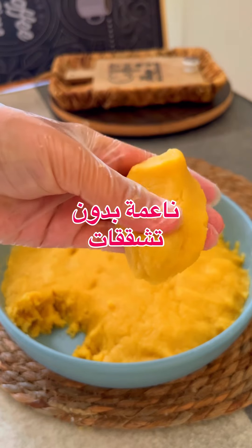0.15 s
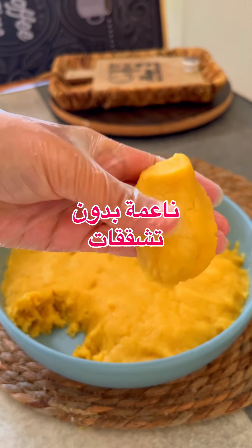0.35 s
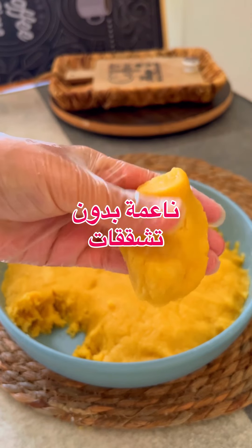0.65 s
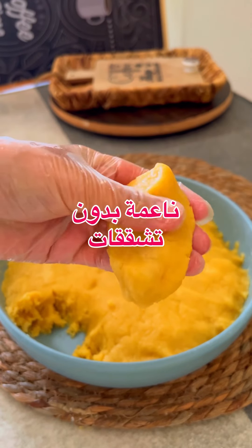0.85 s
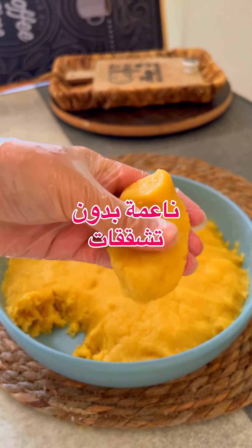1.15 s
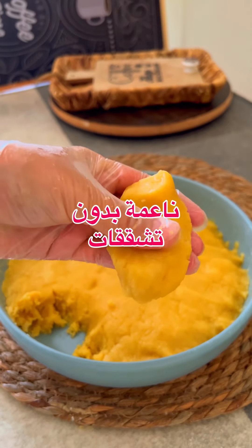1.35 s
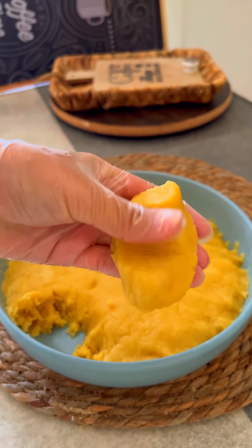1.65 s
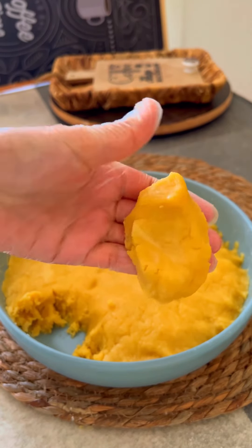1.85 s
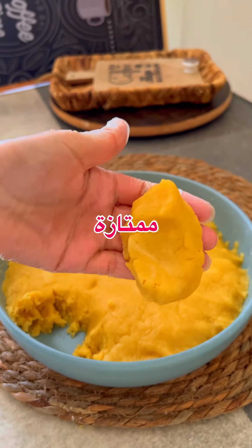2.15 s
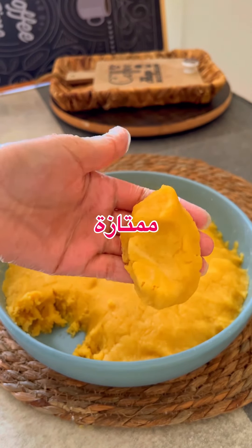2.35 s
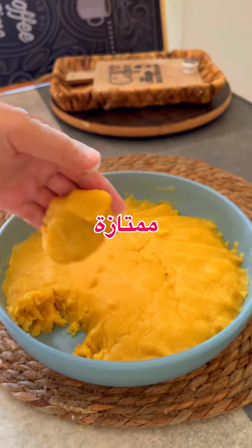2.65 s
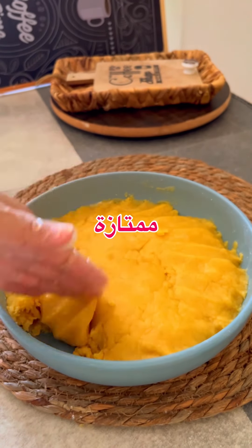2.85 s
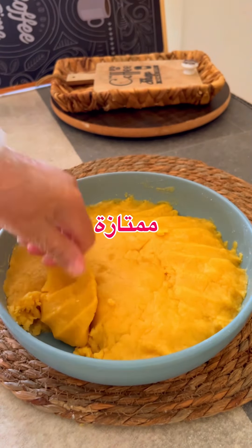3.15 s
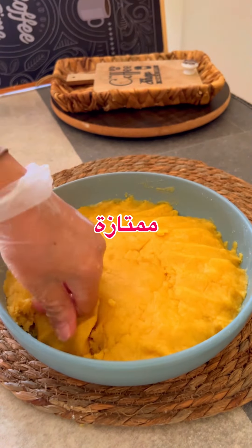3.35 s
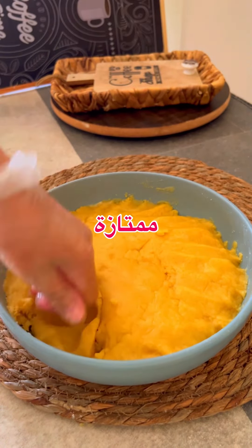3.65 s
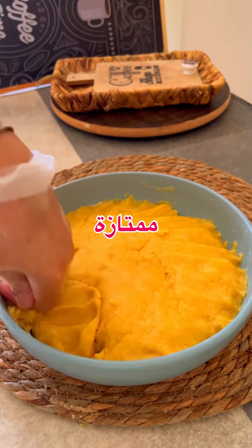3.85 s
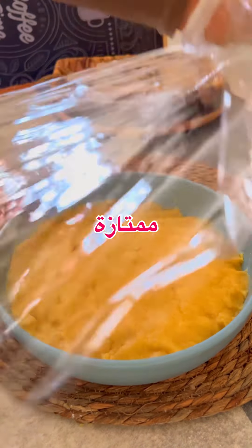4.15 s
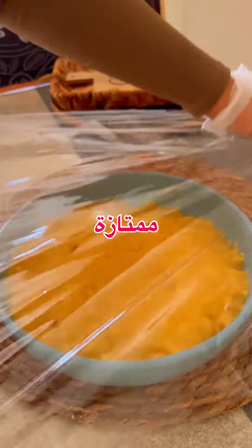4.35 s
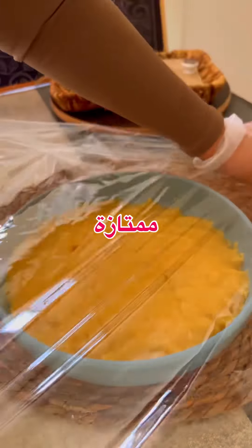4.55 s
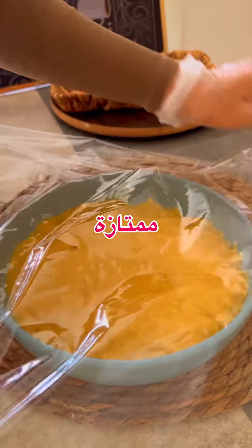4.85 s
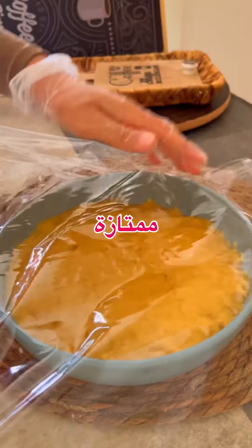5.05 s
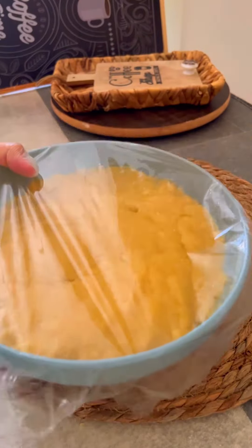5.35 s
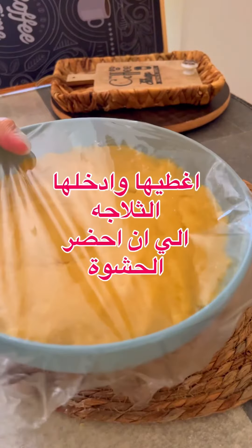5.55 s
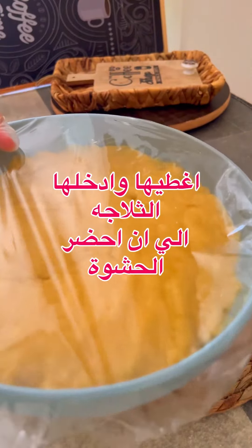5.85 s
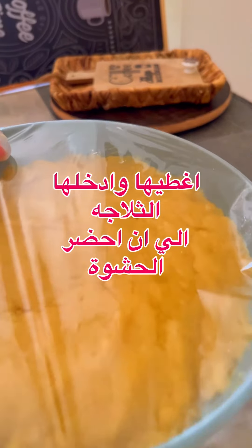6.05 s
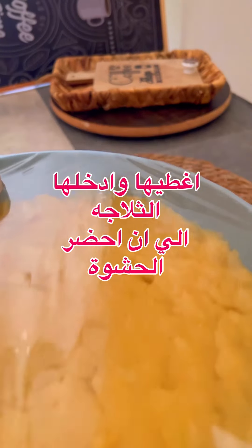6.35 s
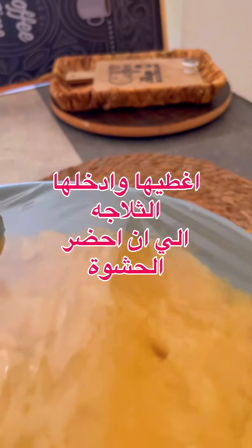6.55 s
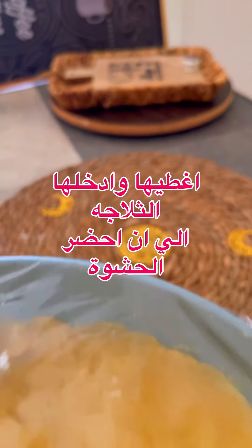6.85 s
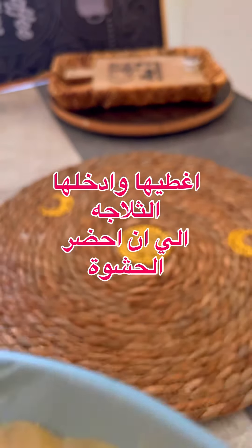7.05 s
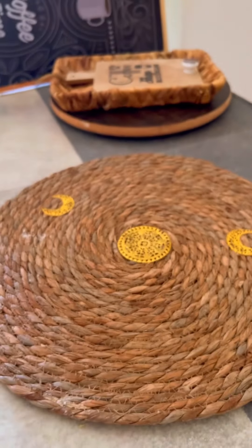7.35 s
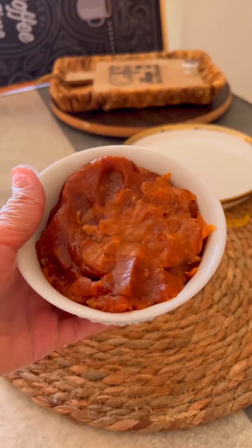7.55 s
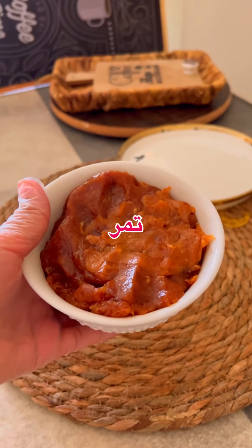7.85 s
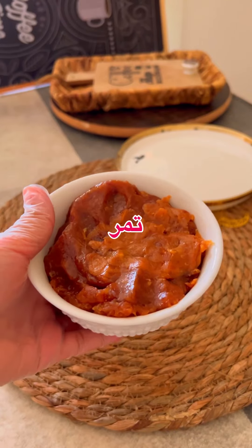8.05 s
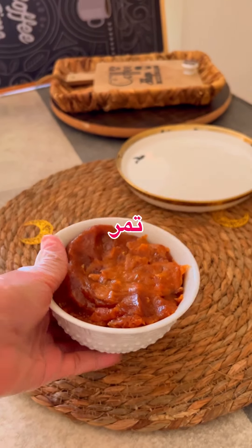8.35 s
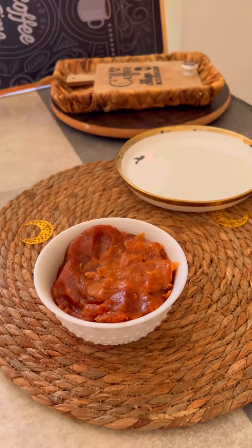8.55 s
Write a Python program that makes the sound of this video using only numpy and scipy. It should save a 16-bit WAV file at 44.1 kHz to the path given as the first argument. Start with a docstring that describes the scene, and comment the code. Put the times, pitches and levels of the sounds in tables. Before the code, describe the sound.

A fridge hums low in a small kitchen. Close to the microphone, a hand in a thin plastic glove smooths and presses soft dough with faint swishes, tiny snaps and sticky smacks. Cling film is then stretched over a bowl, crackling, popping and squeaking, louder than the rest. The bowl scrapes faintly, dishes tick, and a small dish rasps onto a woven mat and clinks.

```python
"""A fridge hums in a small kitchen throughout. Close up, a hand in a thin plastic glove smooths soft dough
with sticky smacks, then presses it into its bowl. From 4 s cling film is drawn over the bowl and swept
tight: it crackles, pops and squeaks. Near 6.5 s the bowl scrapes and is lifted off; near 8.5 s a small
dish rasps onto a woven mat and clinks. Four times the sound dips briefly and the hum steps in level."""
import sys
import numpy as np
from scipy import signal
from scipy.fft import rfft, irfft, next_fast_len
from scipy.io import wavfile

SR = 44100
rng = np.random.default_rng(int(sys.argv[2]) if len(sys.argv) > 2 else 0)


def log_audio(samples):
    """Write samples as a 16-bit WAV file to the path given in sys.argv[1]."""
    # one column per channel
    frames = np.atleast_2d(samples).T
    # limit to full scale, then quantise
    limited = np.clip(frames, -1, 1)
    pcm = np.round(limited * 32767).astype(np.int16)
    wavfile.write(sys.argv[1], SR, pcm)


N = 383662
TIME_S = np.arange(N) / SR

# background steps: (start [s], beat crest [s], hum [dB], buzz [dB], casing [dB], rumble [dB], draught [dB])
PASSAGES = [(0, 0.416, -51, -69, 2.5, -54.5, -73), (3.955, 4.05, -49, -60, 0.5, -55.5, -76),
            (5.336, 5.452, -49.5, -59.5, 0.3, -55.5, -83), (7.4945, 7.694, -55.5, -64, -10.5, -61, -83),
            (8.435, 8.58, -55, -70, -14, -59.5, -78)]
# hum waver in the first passage: (time [s], gain [dB])
HUM_WAVER = [(0, 0), (.42, 4.5), (.8, 1), (1.45, 6), (2.0, -7.5), (2.4, 7), (2.7, 5), (3.3, -6.5),
             (3.7, -1.5)]
# motor's fourth order: (time [s], level [dB])
MOTOR_OVERTONE = [(0, -63.5), (.9, -67.5), (1.2, -56.5), (2.0, -60), (3.3, -70.5), (3.85, -67), (4.1, -57),
                  (5.1, -67), (6.2, -67.5), (6.8, -59), (7.8, -64)]
# fridge casing modes, and a faint room resonance near 900 Hz: (frequency [Hz], width [Hz], level [dB])
CASING_MODES = [(193.6, 4.4, -62), (312.6, 2.7, -70), (345.8, 2.9, -70.5), (374.5, 2.5, -74.5),
                (899, 28, -87)]
# room air spectra: (frequency [Hz], level [dB])
RUMBLE_SPECTRUM = [(22, -31), (44, 6.5), (62, -2.5), (82, -8.5), (105, 7.5), (135, -5), (175, 3.5),
                   (260, -2.5), (360, -6.5), (470, -17), (660, -30.5), (1100, -31), (1700, -39.5),
                   (4000, -62.5)]
DRAUGHT_SPECTRUM = [(300, -5.5), (720, 8.5), (900, 10.5), (1020, 5.5), (1300, 2), (2200, -35)]
HISS_SPECTRUM = [(400, 14.5), (750, 5), (1100, 14), (1600, 7.5), (3500, 3), (5000, -2.5), (7500, 3),
                 (10000, -2.5), (12500, -16.5), (16000, -36)]
# stereo width of air and of close sounds: (frequency [Hz], side over mid [dB])
AIR_WIDTH = [(130, -16), (260, -15), (520, 2), (1000, 0.5), (4000, -2.5), (12000, -7.5)]
CLOSE_WIDTH = [(400, -16), (3000, -34), (7000, -5), (10000, -7), (13000, -1.5)]
# friction spectra: (frequency [Hz], level [dB])
GLOVE_SPECTRUM = [(350, -32.5), (600, -5.5), (1030, -21), (1260, -9), (2200, -7.5), (3680, -10.5),
                  (4840, -7.5), (6120, 4), (9240, 7.5), (10300, 6), (12000, -14), (14900, -6.5)]
FILM_SPECTRUM = [(200, -26), (350, 4), (1200, 2.5), (1700, -1.5), (2500, -12), (5000, -22), (6100, -15),
                 (7500, -19), (10200, -15), (11900, -30), (16000, -30)]
MAT_SPECTRUM = [(350, -11.5), (1180, -9.5), (2440, -7), (4460, -13), (5500, -8), (8270, 0.5), (9360, 3),
                (11500, -13.5), (16000, -17)]
# top-octave notch of the microphone port: (frequency [Hz], gain [dB])
PORT_NOTCH = [(10200, -3), (12000, -14), (15000, -5.5)]
# glove creases snap: (time [s], level [dB], centre [Hz])
GLOVE_SNAPS = [(0.2037, -53.5, 7000), (0.2813, -42.5, 5730), (0.621, -46, 9500), (0.6492, -35, 9100),
               (1.0156, -42, 9000), (1.046, -34.5, 8800), (1.1366, -45, 6500), (1.337, -52.5, 6500),
               (1.7945, -47, 6440), (1.816, -48.5, 5700), (2.0223, -51, 4400), (2.8524, -41, 7940),
               (3.0468, -48, 5000), (3.6084, -34, 5760), (3.6214, -36, 10100), (3.642, -33, 5700),
               (3.6665, -42, 5400)]
# thumb smooths the lump: (time [s], swish [dB], rub [dB])
THUMB_STROKES = [(0.287, -63.5, -71), (0.65, -55.5, -72), (1.041, -57.5, -75.5), (1.399, -65, -79.5),
                 (1.655, -58.5, -74.5)]
# dough lets go of the thumb: (time [s], level [dB], centre [Hz])
DOUGH_SMACKS = [(0.7463, -42.5, 2880), (1.0638, -48, 2950), (1.483, -50.5, 2550), (1.7598, -46.5, 2650),
                (1.7742, -44, 2700)]
# fingers slide on dough, film or dish: (time [s], half length [s], level [dB], centre [Hz])
FINGER_SLIDES = [(1.818, 0.015, -61.5, 5600), (1.96, 0.025, -73, 5470), (3.032, 0.014, -64.5, 11500),
                 (3.738, 0.018, -50.5, 6500), (3.772, 0.027, -51.5, 7450), (4.329, 0.0062, -49, 7940),
                 (7.72, 0.1, -86.5, 4760), (8.236, 0.0046, -50.5, 9700), (8.526, 0.0081, -49, 11600)]
# whole hand presses the dough: (time [s], half length [s], level [dB])
HAND_PRESSES = [(1.83, 0.089, -70), (2.58, 0.026, -72.5), (2.778, 0.022, -60.5), (2.845, 0.02, -64),
                (2.93, 0.084, -70), (3.02, 0.024, -66.5), (3.168, 0.014, -58.5), (3.31, 0.15, -74.5),
                (3.609, 0.011, -59.5), (3.644, 0.0084, -57.5), (3.667, 0.0063, -57), (3.805, 0.032, -61),
                (3.89, 0.2, -74)]
# pats of dough and palm, and at 5.12 s a squeak of the film on the rim: (time [s], level [dB], centre [Hz])
SOFT_PATS = [(2.841, -40.5, 470), (2.849, -37.5, 600), (5.123, -25, 1240)]
# film picked up, drawn out, swept round the rim: (start [s], length [s], level [dB], sag [dB/s])
FILM_PULLS = [(3.928, 0.17, -67.5, 38), (4.317, 0.48, -59.5, 8.5), (5.073, 0.23, -49, 33.5)]
# taut film modes: (frequency [Hz], width [Hz], level over the pull [dB])
FILM_MODES = [(574, 730, -5), (1230, 180, -1), (1420, 170, -19)]
# film creases pop: (time [s], level [dB])
FILM_POPS = [(3.9776, -22.5), (4.0864, -36), (4.15, -40.5), (4.185, -36), (4.24, -35.5), (4.3692, -21.5),
             (4.3772, -27), (4.4057, -28), (4.4124, -30), (4.512, -32), (4.566, -22.5), (4.7115, -25.5),
             (4.7586, -31), (4.7754, -23), (4.7812, -28), (4.9035, -43), (4.9627, -41.5), (5.034, -44),
             (6.152, -60)]
# film slips on the rim: (time [s], level [dB], centre [Hz])
FILM_CLUCKS = [(4.547, -38.5, 1280), (4.691, -43, 1170), (4.7361, -42, 1210), (5.087, -37, 1198),
               (5.199, -34, 620)]
# handled dishes tick: (time [s], level [dB], centre [Hz])
DISH_TICKS = [(5.9058, -47, 6940), (6.5145, -45.5, 3530), (6.5745, -42, 7500), (6.691, -47, 4570),
              (6.8516, -52, 6140), (7.3726, -35, 6750), (7.581, -51, 3400), (7.987, -60, 3600),
              (8.214, -43, 8100)]
# bowl and dish slide on the mat: (stop [s], level [dB])
MAT_SLIDES = [(6.6, -72.5), (7.375, -77), (8.24, -77), (8.434, -61.5), (8.581, -56.5), (8.69, -70)]
# small dish modes: (frequency [Hz], width [Hz], level [dB])
DISH_MODES = [(6100, 690, -52.5), (9350, 410, -56)]
# dish thuds and clinks to rest: (time [s], level [dB], centre [Hz])
DISH_KNOCKS = [(8.551, -50, 950), (8.589, -47.5, 900), (8.5895, -28, 8650)]

CUTOFF_HZ = 16000


def from_db(db):
    return 10 ** (np.asarray(db) / 20)


def unit_rms(x):
    return x / np.sqrt(np.mean(x ** 2) + 1e-20)


def gain_curve(rows):
    """Gain through (time [s], level [dB]) points."""
    return from_db(np.interp(TIME_S, *np.transpose(rows)))


def bell(at_s, half_s):
    """Smooth swell of height 1."""
    distance = np.minimum(np.abs((TIME_S[::16] - at_s) / half_s), 8)
    return np.interp(TIME_S, TIME_S[::16], np.exp(-distance ** 1.6))


def strokes(rows):
    """Joint gain of bell-shaped strokes, summed in power."""
    return np.sqrt(sum(from_db(db) ** 2 * bell(at_s, half_s) for at_s, half_s, db in rows))


def passage_columns():
    """Columns of the current passage, per sample."""
    rows = np.array(PASSAGES)
    return rows[np.searchsorted(rows[:, 0], TIME_S, side="right") - 1].T


def colour(x, spectrum):
    """Minimum-phase filter with the given spectrum."""
    size = 2 * next_fast_len(N // 2 + 4096)
    hz, db = np.transpose(spectrum)
    bins_hz = np.arange(size // 2 + 1) * SR / size
    log_gain = np.log(from_db(np.interp(np.log(bins_hz + 1), np.log(hz), db)))
    cepstrum = irfft(log_gain)[:size // 2]
    cepstrum[1:] *= 2
    return irfft(rfft(x, size) * np.exp(rfft(cepstrum, size)))[..., :N]


def band(x, low_hz, high_hz, order=2):
    sos = signal.butter(order, [low_hz, min(high_hz, SR * .48)], "band", fs=SR, output="sos")
    return signal.sosfilt(sos, x)


def resonate(x, hz, width_hz):
    """One resonance, unit peak gain."""
    r = np.exp(-np.pi * width_hz / SR)
    poles = [1, -2 * r * np.cos(2 * np.pi * hz / SR), r * r]
    return signal.lfilter(np.array([1, 0, -1]) * (1 - r * r) / 2, poles, x)


def bent_resonance(x, hz, width_hz, bend):
    """Resonance detuned by the fraction bend; rms 1."""
    carrier = np.exp(2j * np.pi * np.cumsum(hz * (1 + bend)) / SR)
    ringing = signal.lfilter([1], [1, -np.exp(-np.pi * width_hz / SR)], x / carrier + 1e-18)
    return unit_rms(band((ringing * carrier).real, hz / 2, hz * 2))


def drift(rate_hz):
    """Slow random wander; rms 1."""
    hop = 40
    r = np.exp(-2 * np.pi * rate_hz * hop / SR)
    slow = signal.lfilter([1], [1, -2 * r, r * r], rng.standard_normal(N // hop + 2002))[2000:]
    return np.interp(np.arange(N) / hop, np.arange(len(slow)), unit_rms(slow))


def fridge(rumble_gain, shaft_hz=57.87, mains_hz=60):
    """The motor slips behind the mains: its second order beats with the buzz near 4 Hz."""
    _, crest_s, hum_db, buzz_db, casing_db, *_ = passage_columns()
    waver = np.where(TIME_S < PASSAGES[1][0], gain_curve(HUM_WAVER), 1)
    rad_per_hz = 2 * np.pi * (TIME_S - crest_s)
    hum = from_db(hum_db) * waver * np.cos(2 * shaft_hz * rad_per_hz)
    buzz = from_db(buzz_db) * np.cos(2 * mains_hz * rad_per_hz)
    shaft_gain = from_db(-58 - 0.5 * drift(4.3)) * unit_rms(np.sqrt(rumble_gain))
    shaft = shaft_gain * np.cos(shaft_hz * rad_per_hz + rng.uniform(0, 2 * np.pi))
    overtone = gain_curve(MOTOR_OVERTONE) * np.cos(4 * shaft_hz * rad_per_hz)
    casing = 0
    for hz, width_hz, db in CASING_MODES:
        drone = resonate(rng.standard_normal(N), hz, width_hz)
        casing += from_db(db) * unit_rms(resonate(drone, hz, width_hz))
    return np.sqrt(2) * (hum + buzz + shaft + overtone) + from_db(casing_db) * casing


def air_gains(swell_s=2.17, half_s=0.71, draught_lag_s=0.19):
    """Rumble and draught step with each passage and swell once."""
    *_, rumble_db, draught_db = passage_columns()
    return (from_db(rumble_db + 4 * bell(swell_s, half_s)),
            from_db(draught_db + 5 * bell(swell_s + draught_lag_s, half_s)))


def room_air(spectrum):
    """Diffuse stereo noise, nearly mono in the bass."""
    mid, side = (unit_rms(colour(rng.standard_normal(N), spectrum)) for _ in range(2))
    return mid + colour(side, AIR_WIDTH) * [[1], [-1]]


def snaps(events, decay_s, width_ratio, flutter_db, flutter_s):
    """Each release or knock is a brief pitched noise burst with a fluttering tail."""
    out, t = np.zeros(N + SR), TIME_S[:SR // 10]
    envelope = t / decay_s * np.exp(1 - t / decay_s) + from_db(flutter_db) * np.exp(-t / flutter_s)
    for at_s, db, hz in events:
        noise = rng.standard_normal(len(t)) * envelope
        burst = band(resonate(noise, hz, width_ratio * hz), hz / 5, CUTOFF_HZ)
        start = round(at_s * SR)
        out[start:start + len(t)] += from_db(db) * burst / np.max(np.abs(burst))
    return colour(out[:N], PORT_NOTCH)


def slips(per_s, spread_db):
    """Tiny random slips of uneven size and either sign; rms 1."""
    sizes = from_db(spread_db * np.minimum(rng.exponential(1, N), 4)) * rng.choice([-1, 1], N)
    return unit_rms(sizes * (rng.random(N) < per_s / SR))


def crinkle(per_s, low_hz, high_hz, q, count=16):
    """Sparse ticks ringing briefly at scattered pitches; rms 1."""
    pitches_hz = np.geomspace(low_hz, high_hz, count)
    return unit_rms(sum(unit_rms(resonate(slips(per_s / count, 2.7), hz, hz / q)) for hz in pitches_hz))


def friction(crisp_gain, dull_gain, spectrum, norm_low_hz, split_hz, per_s, spread_db, clump_db, smooth_db):
    """Slips clump over a smooth rub: crisp above the split, dull below."""
    grain = slips(per_s, spread_db) + from_db(smooth_db) * rng.standard_normal(N)
    rub = colour(grain * from_db(clump_db * drift(46)), spectrum)
    crisp = unit_rms(band(rub, split_hz, SR / 2, order=3))
    dull = band(rub, 290, split_hz, order=3)
    dull /= np.std(band(dull, norm_low_hz, CUTOFF_HZ, order=4))
    return crisp * crisp_gain + dull * dull_gain


def hand_pressure(half_s=0.03, push_lag_s=0.0083, return_lag_s=0.11):
    """The thumb strokes there and back, then the whole hand presses."""
    pushes = [(at_s + push_lag_s, half_s, db) for at_s, _, db in THUMB_STROKES]
    returns = [(at_s + return_lag_s, half_s, db - 1.5) for at_s, _, db in THUMB_STROKES]
    return strokes(pushes + returns + list(HAND_PRESSES))


def thumb_crinkle(half_s=0.049, level_db=-82):
    """Bright glove ticks gather round each thumb push."""
    pushes = strokes([(at_s, half_s, level_db) for at_s, *_ in THUMB_STROKES])
    ticks = crinkle(per_s=260, low_hz=4500, high_hz=13000, q=2.5)
    return pushes * unit_rms(colour(ticks, PORT_NOTCH))


def glove_on_dough(hand_open_s=2.6, muffle_hz=6140):
    """Thin plastic rubs the dough, sticks and lets go; the lump lands with a pat."""
    pressure = hand_pressure()
    closed = TIME_S < hand_open_s   # the closed hand is muffled and stickier
    rub = friction(pressure * from_db(2.5), pressure, GLOVE_SPECTRUM, norm_low_hz=1770, split_hz=4350,
                   per_s=1400, spread_db=1.5, clump_db=3, smooth_db=-4.5)
    rub = np.where(closed, band(rub, 280, muffle_hz), rub)
    ticks = colour(crinkle(per_s=150, low_hz=2400, high_hz=9000, q=8), PORT_NOTCH)
    sticky = from_db(np.where(closed, -1, -4)) * pressure * ticks
    creases = snaps(GLOVE_SNAPS, decay_s=0.00026, width_ratio=0.56, flutter_db=-5.5, flutter_s=0.005)
    smacks = snaps(DOUGH_SMACKS, decay_s=0.0009, width_ratio=0.3, flutter_db=-20, flutter_s=0.0054)
    pats = snaps(SOFT_PATS, decay_s=0.0029, width_ratio=0.42, flutter_db=-18, flutter_s=0.015)
    return from_db(2.64) * rub + sticky + thumb_crinkle() + creases + smacks + pats


def finger_swishes(thumb_half_s=0.0063, thumb_hz=10400, edge_ratio=1.255):
    """A fast slide is a gritty run of slips hissing round one pitch."""
    grain = colour(slips(per_s=5000, spread_db=2.5), PORT_NOTCH)
    thumb = [(at_s, thumb_half_s, db, thumb_hz) for at_s, db, _ in THUMB_STROKES]
    return sum(strokes([(at_s, half_s, db)]) * unit_rms(band(grain, hz / edge_ratio, hz * edge_ratio))
               for at_s, half_s, db, hz in thumb + list(FINGER_SLIDES))


def film_pull(attack_s=0.076, release_s=0.021, slack_db=-81.5):
    """Each pull takes hold, sags and lets go; the slack sheet rustles between."""
    pull = from_db(slack_db)
    for start_s, length_s, db, sag_db_per_s in FILM_PULLS:
        age_s = np.maximum(TIME_S - start_s, 0)
        attack = np.sqrt(np.minimum(age_s / attack_s, 1))
        release = np.exp(-np.maximum(age_s - length_s, 0) / release_s)
        pull = np.hypot(pull, from_db(db - sag_db_per_s * age_s) * attack * release)
    return pull * (TIME_S >= PASSAGES[1][0]) * (TIME_S < PASSAGES[2][0])


def film_squeak(flutter_db=5.5, flutter_hz=25):
    """Stick-slip rings the taut film's modes, which bend together with tension."""
    bend = 0.086 * drift(15)
    squeak = 0
    for hz, width_hz, db in FILM_MODES:
        drive = slips(per_s=1200, spread_db=4.5) * from_db(flutter_db * drift(flutter_hz))
        squeak += from_db(db) * bent_resonance(drive, hz, width_hz, bend)
    return squeak


def cling_film(pop_hz=6330):
    """Film crackles as it stretches, pops where creases part and clucks on the rim."""
    pull = film_pull()
    crisp_gain = from_db(-9) * pull ** 0.75   # harder pulls sound fuller
    rub = friction(crisp_gain, pull, FILM_SPECTRUM, norm_low_hz=605, split_hz=3300,
                   per_s=1800, spread_db=0, clump_db=2, smooth_db=-9.5)
    folds = from_db(-3) * crisp_gain * crinkle(per_s=260, low_hz=1400, high_hz=10500, q=2.2)
    creases = [(at_s, db, pop_hz) for at_s, db in FILM_POPS]
    pops = snaps(creases, decay_s=0.00021, width_ratio=2.2, flutter_db=-8, flutter_s=0.0053)
    clucks = snaps(FILM_CLUCKS, decay_s=0.0018, width_ratio=0.2, flutter_db=-20, flutter_s=0.008)
    return from_db(-1) * rub + pull * film_squeak() + colour(folds, PORT_NOTCH) + pops + clucks


def mat_drag(swell_db_per_s=203, hold_s=0.034, fade_db_per_s=240):
    """Drag grows as weight settles on the mat, holds, then fades at the stop."""
    passage_start_s = passage_columns()[0]
    drag = 0
    for stop_s, db in MAT_SLIDES:
        swell_db = np.minimum(TIME_S - stop_s + hold_s, 0) * swell_db_per_s
        fade_db = np.maximum(TIME_S - stop_s, 0) * fade_db_per_s
        drag += from_db(db + swell_db - fade_db) * (passage_start_s < stop_s)
    return drag


def dishes():
    """Dishes tick in the hand, drag over the mat's fibres and knock to rest."""
    drag = mat_drag()
    rub = friction(from_db(-4) * drag, drag, MAT_SPECTRUM, norm_low_hz=1800, split_hz=6000,
                   per_s=2000, spread_db=2, clump_db=3.5, smooth_db=0.5)
    ticks = snaps(DISH_TICKS, decay_s=0.0001, width_ratio=0.22, flutter_db=-11, flutter_s=0.0029)
    knocks = snaps(DISH_KNOCKS, decay_s=0.0016, width_ratio=0.48, flutter_db=-19, flutter_s=0.0086)
    return from_db(0.7) * rub + dish_rasp(drag) + band(ticks, 3900, CUTOFF_HZ) + knocks


def dish_rasp(drag):
    """Fibres catch the small dish's foot and ring two modes that wander with the grip."""
    catches = slips(per_s=1100, spread_db=1.5)
    bend = 0.018 * drift(14)
    ring = sum(from_db(db) * bent_resonance(catches, hz, width_hz, bend) for hz, width_hz, db in DISH_MODES)
    return drag / drag.max() * colour(ring, PORT_NOTCH) * (TIME_S > PASSAGES[3][0])


def kitchen(x, t60_s, room_db, scatter_s):
    """Bowl and worktop scatter phase between left and right; walls add a short tail."""
    t = TIME_S[:SR // 2]
    tails = band(rng.standard_normal((2, len(t))), 300, 9000, order=1)
    tails *= from_db(-60 * t / t60_s) * (t > .004)
    tails /= np.linalg.norm(tails, axis=1, keepdims=True)
    reverb = signal.fftconvolve(x[None], tails, axes=1)[:, :N]
    scatter = rng.standard_normal(len(t)) * t * np.exp(-t / scatter_s)
    scatter = np.concatenate([-scatter[::-1], scatter[1:]])   # odd: equal level in both ears
    scatter /= np.linalg.norm(scatter)
    width = from_db(np.interp(np.fft.rfftfreq(len(scatter), 1 / SR), *np.transpose(CLOSE_WIDTH)))
    side = signal.fftconvolve(x, irfft(rfft(scatter) * width, len(scatter)), mode="same")
    return x + side * [[1], [-1]] + from_db(room_db) * reverb


def worktop(x, delays_s=(0.0019, 0.0024), bounce_db=-15):
    """One early bounce, with its own delay left and right."""
    bounce = [np.interp(TIME_S - lag_s, TIME_S, channel, left=0) for lag_s, channel in zip(delays_s, x)]
    return x + from_db(bounce_db) * np.array(bounce)


def scene():
    """Hand work in front of the fridge and the kitchen air."""
    work = glove_on_dough() + finger_swishes() + cling_film() + dishes()
    work = worktop(kitchen(work, t60_s=0.19, room_db=-10.5, scatter_s=0.00027))
    rumble_gain, draught_gain = air_gains()
    background = fridge(rumble_gain) + rumble_gain * room_air(RUMBLE_SPECTRUM)
    background += draught_gain * room_air(DRAUGHT_SPECTRUM) + from_db(-81.5) * room_air(HISS_SPECTRUM)
    return work + background * from_db([[-.45], [.45]])


def record(dry, recover_s=0.018, click_s=7.4945, click_db=-45, click_decay_s=0.00084):
    """The sound drops out and fades back four times, once with a click; then a steep low-pass."""
    for start_s, *_ in PASSAGES[1:]:
        dry = dry * np.where(TIME_S < start_s, 1, np.clip((TIME_S - start_s) / recover_s, 0, 1))
    click = from_db(click_db) * (TIME_S >= click_s) * np.exp(-np.abs(TIME_S - click_s) / click_decay_s)
    low_pass = signal.cheby2(16, 60, CUTOFF_HZ + 500, fs=SR, output="sos")
    return signal.sosfilt(low_pass, dry + click)


dry = scene()
out = record(dry)
log_audio(out)
```